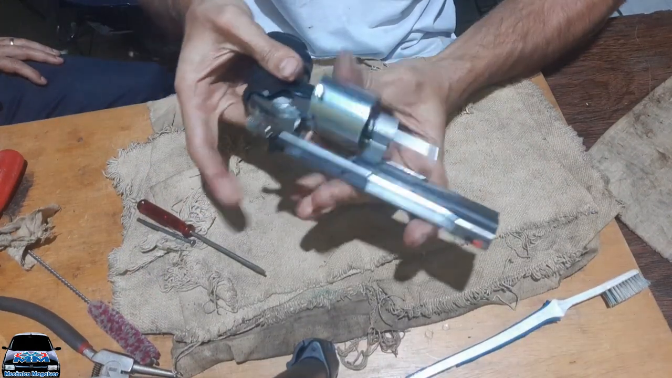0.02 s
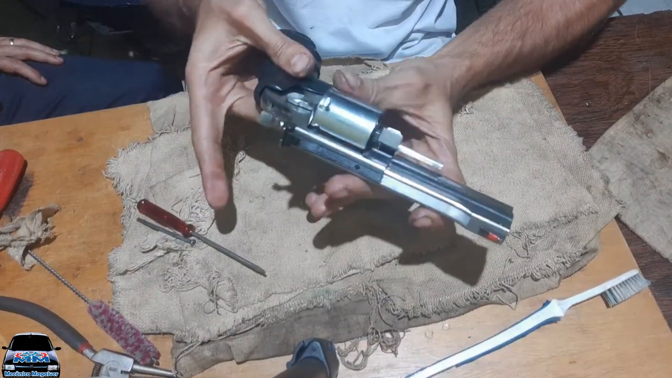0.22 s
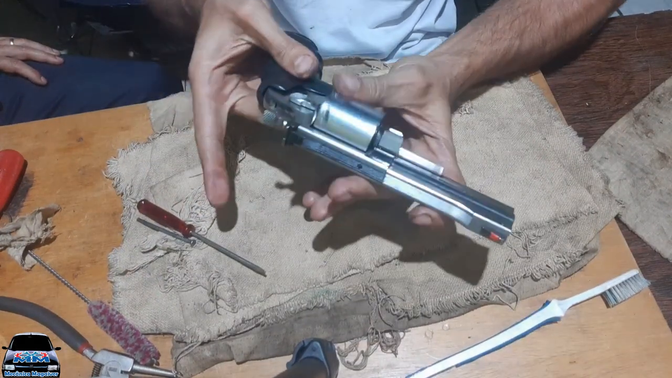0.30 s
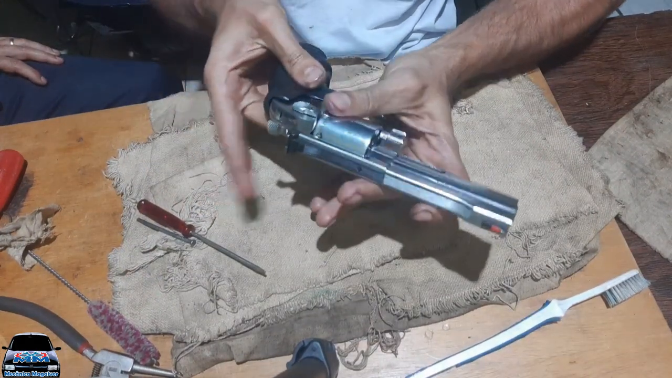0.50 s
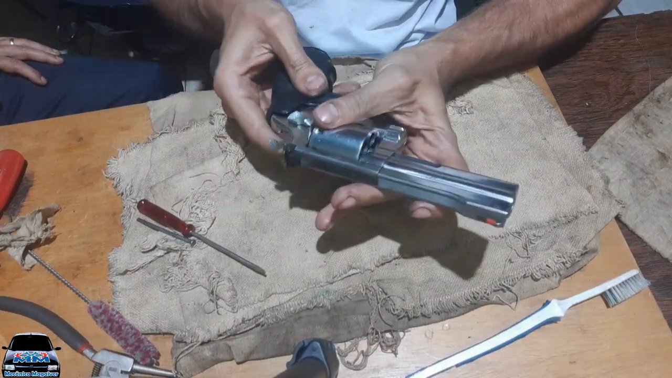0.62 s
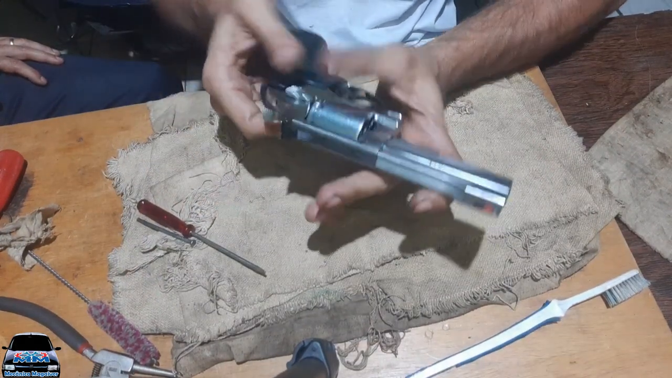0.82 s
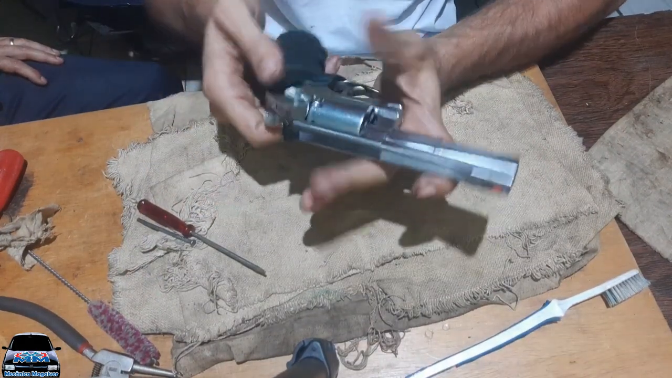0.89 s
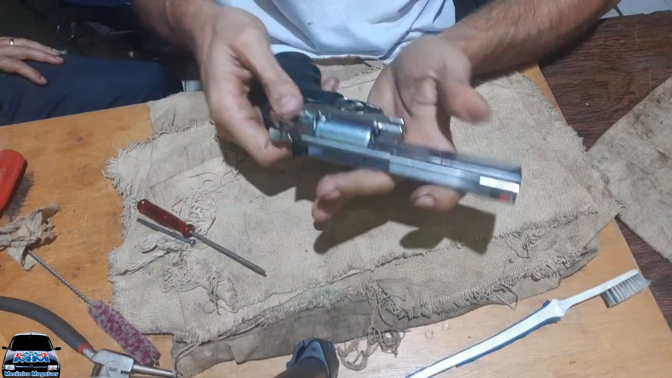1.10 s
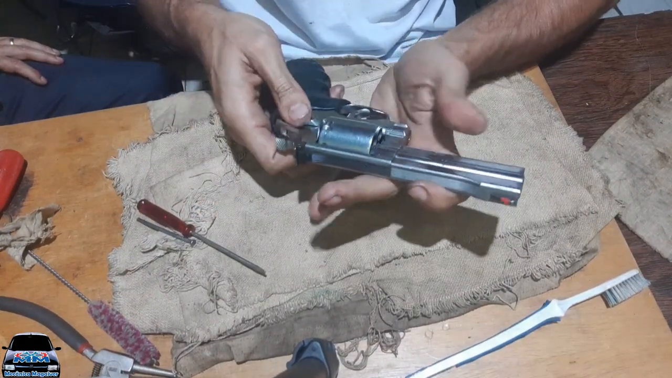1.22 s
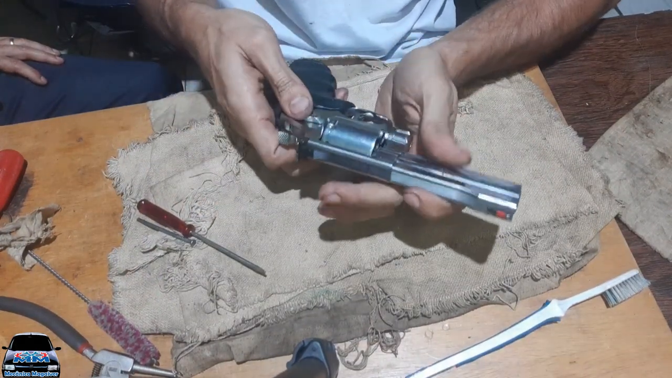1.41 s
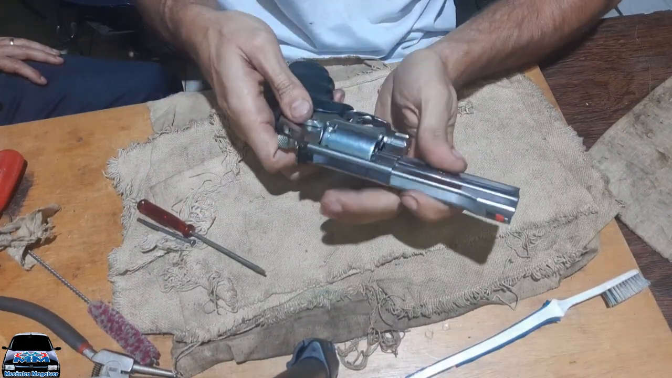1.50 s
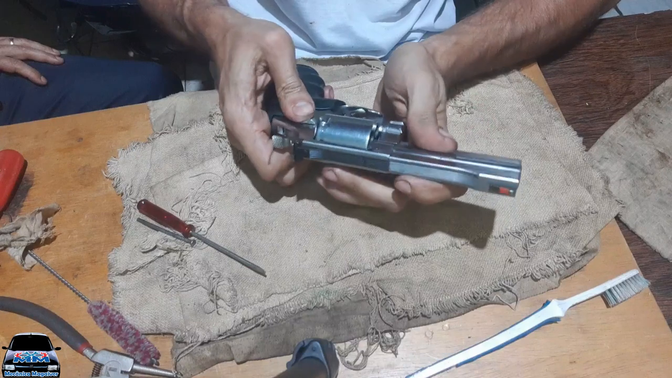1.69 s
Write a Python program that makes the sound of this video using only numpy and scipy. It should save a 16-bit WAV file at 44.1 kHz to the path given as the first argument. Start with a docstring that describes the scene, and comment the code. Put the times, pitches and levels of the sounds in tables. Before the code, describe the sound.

Three sharp steel clicks of a hand-held revolver in a small live room, over faint hum

```python
"""Revolver handled over a workbench

In a small, live room, close by, the cylinder snaps shut, turns until its stop drops into a notch,
and the hammer is cocked. Each click is a few steel contacts: noise cracks and damped paired modes.
A grip knock, faint rings and a diffuse noise tail follow; swells of noise are sliding and a scuff.
A low sine hum and banded room noise lie beneath; two faint narrow-band tones waver near the end."""
import sys
import numpy as np
from scipy import signal
from scipy.io import wavfile

SR = 44100
rng = np.random.default_rng(int(sys.argv[2]) if len(sys.argv) > 2 else 0)


def materialize(psi):
    """Save the field psi as 16-bit PCM at rate SR to the path in sys.argv[1].

    A 1-D psi becomes a single channel; in a 2-D psi each row is a channel.
    """
    bounded = np.clip(np.atleast_2d(psi).T, -1, 1)
    quanta = np.round(bounded * 32767).astype(np.int16)
    wavfile.write(sys.argv[1], SR, quanta)


N = 74970
T = np.arange(N) / SR   # time in s

# room noise in bands: pitch_hz, level_db (gain of the white noise), left_right_correlation
ROOM_NOISE = [(25.4, -49.5, .9), (61.4, -42, 0.93), (109.4, -42.5, 0.89), (167, -57.5, 0.66),
              (420, -54.5, 0.61), (1120, -59, 0.11), (1840, -66, 0.14), (4736, -76, 0.086),
              (9190, -77, 0.13), (15000, -91, 0.29)]
# change in level of the noise below RUMBLE_TOP_HZ: time_s, level_db
RUMBLE_LEVEL = [(0, 1.5), (.35, -1.5), (.55, 4.5), (.9, 3.5), (1.15, 2.5), (1.4, 0), (1.7, -3)]
# change in level of the noise above it: time_s, level_db
HISS_LEVEL = [(0, 1), (.2, 0), (.6, 5.5), (1.0, 5), (1.3, 2), (1.7, 0)]
# level of the hum: time_s, level_db
HUM_LEVEL = [(0, -69.5), (.3, -64), (.7, -61), (1.1, -64.5), (1.3, -64), (1.5, -92), (1.7, -78.5)]
RUMBLE_TOP_HZ, HUM_HZ = 160, 104

# steel contacts as the cylinder shuts: start_s, strength_db
SHUT_CONTACTS = [(0.2254, -9.5), (0.2265, -3.5), (0.2278, -6)]
# steel contacts as the stop drops into its notch: start_s, strength_db
LOCK_CONTACTS = [(0.499, -1.5), (0.5022, -14.5)]
# steel contacts as the hammer is cocked: start_s, strength_db
COCK_CONTACTS = [(0.7160, -15), (0.7172, 1), (0.7188, -4), (0.7186, -8.5)]
ACTIONS = (SHUT_CONTACTS, LOCK_CONTACTS, COCK_CONTACTS)
# modes of the hand-held frame, levels relative to the contacts:
# pair_centre_hz, t60_s, shut_db, lock_db, cock_db
FRAME_MODES = [(812, .022, -43.5, -57, -45), (1130, 0.013, -43.5, -43.5, -36.5),
               (1503, .028, -25.5, -37, -37.5), (1785, .016, -31, -49, -47), (1970, 0.014, -29, -62, -43),
               (2370, .021, -19.5, -28.5, -46), (2662, 0.018, -34.5, -65, -63),
               (3230, 0.023, -24, -42, -35.5), (3738, 0.012, -32.5, -37, -43),
               (4168, 0.014, -19, -21.5, -29), (4716, 0.0099, -24.5, -45.5, -44),
               (5270, 0.016, -27, -34.5, -37.5), (5670, .02, -41, -25.5, -31),
               (5970, .018, -37.5, -30.5, -35.5), (7800, 0.013, -34.5, -54, -35.5),
               (8990, 0.013, -41.5, -27.5, -32), (10500, 0.0099, -46, -37, -39.5)]
# noise colour of the contacts, relative to their strength: pitch_hz, shut_db, lock_db, cock_db
CRACK_COLOUR = [(243.5, -57, -57, -52), (640, -21.5, -20, -38), (1104, -22.5, -39.5, -26.5),
                (1997, -7.5, -30, -34), (4020, -12, -17.5, -23.5), (7550, -14, -16.5, -24),
                (10865, -28, -29.5, -20.5), (15000, -29, -31.5, -41)]
CRACK_T60_S = 0.013
LOW_CUT_HZ = 490   # the gun is too small to radiate bass
PAIR_SPLIT_HZ = 70   # spacing of the two modes in a pair
PAIR_APART_HZ = 2010   # above this the two of a pair radiate in different directions
MODE_TURN_RAD, MODE_TURN_HALF_HZ = 2.3, 1200   # limit of the phase between sides; pitch of half that
ALIKE_BELOW_HZ = 3000   # the crack is much alike on both sides below this
PAN_DB, SHADED_ABOVE_HZ = 2, 3200   # limit of the lean on each side; pitch of half that

# hollow knock of the grip: level_db, one value each for shut, lock and cock
KNOCK_LEVELS = [-40, -33, -44.5]
KNOCK_HZ, KNOCK_T60_S, KNOCK_BUILD_S = 496, 0.033, 0.0066
# parts that ring on faintly: start_s, pitch_hz, level_db, t60_s
FAINT_RINGS = [(0.225, 1486, -55, 0.27), (0.227, 1520, -56, 0.54), (0.226, 2003, -56, 0.24),
               (0.226, 2170, -57, 0.18), (0.227, 2425, -64, 0.24), (0.224, 2670, -53, 0.41),
               (0.227, 2812, -58, 0.35), (0.225, 3056, -49, 0.3), (0.227, 3140, -53, 0.25),
               (0.225, 4110, -54.5, 0.25), (0.226, 4365, -57.5, 0.22), (0.226, 7660, -58, 0.43),
               (0.499, 624, -63, 1), (0.497, 390, -70.5, 1), (0.499, 4065, -58.5, 0.32),
               (0.5, 5900, -57, 0.32), (0.499, 7370, -66, .35), (0.718, 4083, -65, 0.32),
               (0.718, 4295, -65, 0.4), (0.718, 5745, -58.5, 0.35), (0.718, 9200, -60.5, 0.35)]

# the room's tail after each action, before early scatter and gun colour:
# pitch_hz, t60_s, shut_db, lock_db, cock_db
ROOM_TAIL = [(256.6, 0.67, -73, -65.5, -55), (594, 1, -42, -62.5, -62), (1103, 0.42, -44, -46.5, -48),
             (1478, 0.59, -35.5, -53.5, -51.5), (2580, 0.78, -36.5, -54, -55),
             (4200, 0.61, -37.5, -47.5, -47), (5850, 0.66, -41, -46.5, -48),
             (8500, 0.51, -43, -43.5, -46.5), (10800, 0.43, -47.5, -53.5, -42),
             (15020, 0.33, -62, -56, -65)]
# resonances of the gun added to the room's tail: pitch_hz, width_hz, gain_db
GUN_RESONANCES = [(1520, 94, 5), (1930, 60, -10), (2380, 63, 0.5), (2640, 140, -2.5), (3174, 59, -7.5),
                  (4160, 220, 2.5), (6100, 225, -7.5), (7550, 290, -4), (9800, 250, -6)]
ROOM_DELAY_S, ROOM_BUILD_S = 0.0013, 0.0042
EARLY_DB, EARLY_T60_S = 1, 0.08   # boost relative to the tail; its fade on top of the tail's decay
ROOM_LIKENESS, ROOM_PAN_DB = 0.019, 0.1   # left-right correlation; boost at left and cut at right

# steel sliding under the fingers, level before colour: peak_s, rise_s, fall_s, level_db
STEEL_SLIDES = [(0.4925, 0.0056, 0.007, -53.5), (0.711, 0.0092, 0.004, -67)]
# colour of the sliding: pitch_hz, gain_db
STEEL_SLIDE_COLOUR = [(300, -26), (900, 6.5), (1600, 18), (2700, 6.5), (6000, -1.5), (10000, -6.5),
                      (15000, -25)]
# the hand scuffs the grip, level before colour: peak_s, rise_s, fall_s, level_db
GRIP_SCUFFS = [(1.074, 0.014, .018, -69.5)]
# colour of the scuff: pitch_hz, gain_db
GRIP_SCUFF_COLOUR = [(300, -24), (1000, -9), (1700, 13), (2700, 12), (4000, 7.5), (6000, -4), (10000, -1),
                     (15000, -20)]

# faint, breathy tone wavering in the background: time_s, pitch_hz, level_db
HIGH_TONE_PATH = [(1.13, 1240, -84), (1.21, 1250, -63), (1.3, 1245, -69), (1.37, 1225, -71),
                  (1.41, 1190, -67.5), (1.47, 1240, -67.5), (1.545, 1199, -66), (1.61, 1209, -76.5),
                  (1.655, 1189, -66), (1.69, 1162, -84.5)]
# lower tone swelling beneath it: time_s, pitch_hz, level_db
LOW_TONE_PATH = [(1.33, 480, -93), (1.44, 475.8, -73.5), (1.5, 485, -72), (1.536, 471.6, -68),
                 (1.7, 459, -71.5)]
HIGH_WIDTH_HZ, HIGH_LIKENESS = 70, -0.36   # bandwidth; left-right correlation
LOW_WIDTH_HZ, LOW_LIKENESS = 88, 0.79
CUTOFF_HZ = 15800

LEFT_RIGHT = np.array([[1], [-1]])   # opposite signs for the two channels


def from_db(db):
    """Amplitude gain is ten to the power of decibels over twenty."""
    return 10 ** (np.asarray(db) / 20)


def at_hz(table, hz, axis=1):
    """Interpolation on a logarithmic pitch axis reads one column of a table."""
    table = np.array(table)
    return np.interp(np.log(hz), np.log(table[:, 0]), table[:, axis])


def gain_curve(rows):
    """Straight lines in decibels between time points give a gain over time."""
    return from_db(np.interp(T, *np.transpose(rows)))


def dying(start, t60):
    """Exponential decay: from 1 at the start, amplitude falls by 60 dB in t60."""
    return (T >= start) * np.exp(-np.log(1000) * np.maximum(T - start, 0) / t60)


def ring(start, hz, t60):
    """Free vibration: a struck mode is a sine with exponential decay."""
    return dying(start, t60) * np.sin(2 * np.pi * hz * (T - start))


def noise_bands():
    """Band-pass filtering splits white noise: half octaves in the bass, thirds above."""
    edges = np.r_[np.geomspace(22, 1000, 11)[:-1], np.geomspace(1000, 17000, 14)]
    # neighbouring bands take different noise; the extra samples let the filters settle
    white = rng.standard_normal((2, 2, N + 8000))
    for k, (low, high) in enumerate(zip(edges, edges[1:])):
        sos = signal.butter(2, [low, high], "band", fs=SR, output="sos")
        mid, side = signal.sosfilt(sos, white[k % 2])[:, -N:]
        yield np.sqrt(low * high), mid, side * LEFT_RIGHT


def stereo(mid, side, likeness):
    """Mid-side mixing of independent noises sets the correlation between two channels."""
    c = np.clip(likeness, -1, 1)
    return np.sqrt((1 + c) / 2) * mid + np.sqrt((1 - c) / 2) * side


def background():
    """Stationary noise under slow level curves gives rumble and hiss; a sine gives the hum."""
    rumble, hiss = gain_curve(RUMBLE_LEVEL), gain_curve(HISS_LEVEL)
    noise = 0
    for hz, mid, side in noise_bands():
        change = rumble if hz < RUMBLE_TOP_HZ else hiss
        likeness = at_hz(ROOM_NOISE, hz, axis=2)
        noise = noise + change * from_db(at_hz(ROOM_NOISE, hz)) * stereo(mid, side, likeness)
    hum = gain_curve(HUM_LEVEL) * np.sin(2 * np.pi * (HUM_HZ * T + rng.random()))
    return noise + hum


def struck(contacts, t60):
    """Energy addition: the squared envelopes of successive contacts are summed."""
    return np.sqrt(sum((from_db(db) * dying(s, t60)) ** 2 for s, db in contacts))


def placed(hz):
    """Level difference between the sides grows with pitch: the treble leans to the left."""
    return from_db(PAN_DB * LEFT_RIGHT / (1 + (SHADED_ABOVE_HZ / hz) ** 2))


def frame_mode(hz, since, lead):
    """Beating of a close pair of modes, shared unequally by the sides; lead +1 puts left first."""
    turn = lead * MODE_TURN_RAD * hz / (hz + MODE_TURN_HALF_HZ) * LEFT_RIGHT / 2
    low = np.sin(2 * np.pi * (hz - PAIR_SPLIT_HZ / 2) * since + turn)
    high = np.sin(2 * np.pi * (hz + PAIR_SPLIT_HZ / 2) * since + turn)
    high_share = .5 - lead * LEFT_RIGHT / 2 / (1 + (PAIR_APART_HZ / hz) ** 2)
    return ((1 - high_share) * low + high_share * high) * placed(hz)


def clicks():
    """Impact excitation: contacts give a noise crack and ring the frame, coloured by action."""
    out, bands = np.zeros((2, N)), list(noise_bands())
    for k, contacts in enumerate(ACTIONS):
        since = T - contacts[0][0]
        for m, (hz, t60, *levels) in enumerate(FRAME_MODES):
            lead = (-1) ** m
            out += from_db(levels[k]) * struck(contacts, t60) * frame_mode(hz, since, lead)
        crack = 0
        for hz, mid, side in bands:
            gain = from_db(at_hz(CRACK_COLOUR, hz, axis=k + 1)) * placed(hz)
            likeness = 1 / (1 + (hz / ALIKE_BELOW_HZ) ** 2)
            crack = crack + gain * stereo(mid, side, likeness)
        out += struck(contacts, CRACK_T60_S) * crack
    low_cut = signal.butter(4, LOW_CUT_HZ, "high", fs=SR, output="sos")
    return signal.sosfilt(low_cut, out + 1e-18)   # tiny offset avoids slow denormal numbers


def knocks():
    """Delayed build-up of a damped mode: the grip answers each action just after the steel."""
    out = 0
    for contacts, db in zip(ACTIONS, KNOCK_LEVELS):
        start = contacts[0][0]
        build = np.clip((T - start) / KNOCK_BUILD_S, 0, 1)
        out = out + from_db(db) * build * ring(start, KNOCK_HZ, KNOCK_T60_S)
    return out


def after_ring():
    """Light damping: parts that the hands do not damp sing on."""
    return sum(from_db(db) * ring(s, hz, t60) for s, hz, db, t60 in FAINT_RINGS)


def room():
    """Reverberation: early scatter from the bench, then a diffuse tail decaying band by band."""
    out = 0
    starts = [contacts[0][0] + ROOM_DELAY_S for contacts in ACTIONS]
    swells = []
    for s in starts:
        build = np.clip((T - s) / ROOM_BUILD_S, 0, 1)
        swells.append(build * (1 + from_db(EARLY_DB) * dying(s, EARLY_T60_S)))
    for hz, mid, side in noise_bands():
        t60 = at_hz(ROOM_TAIL, hz)
        level = sum(from_db(at_hz(ROOM_TAIL, hz, axis=k + 2)) * swells[k] * dying(s, t60)
                    for k, s in enumerate(starts))
        out = out + level * stereo(mid, side, ROOM_LIKENESS)
    return out * from_db(ROOM_PAN_DB * LEFT_RIGHT)


def coloured(x):
    """Resonance: narrow filters added in parallel keep the gun's strongest modes in the tail."""
    out = x
    for hz, width, db in GUN_RESONANCES:
        b, a = signal.iirpeak(hz, hz / width, fs=SR)
        out = out + from_db(db) * signal.lfilter(b, a, x)
    return out


def friction(strokes, colour):
    """Sliding friction: coloured noise swells and fades on Gaussian flanks as the gun is moved."""
    swell = 0
    for s, rise, fall, db in strokes:
        flank = np.where(T < s, rise, fall)   # standard deviation in s
        swell = swell + from_db(db) * np.exp(-((T - s) / flank) ** 2 / 2)
    return swell * sum(from_db(at_hz(colour, hz)) * mid for hz, mid, side in noise_bands())


def wavering_tone(rows, width_hz, likeness):
    """Quadrature modulation: slow noise on a gliding carrier makes a narrow-band tone."""
    times, pitches, levels = np.transpose(rows)
    hz, db = np.interp(T, times, pitches), np.interp(T, times, levels)
    low_pass = signal.butter(2, width_hz / 2, fs=SR, output="sos")
    flutter = signal.sosfilt(low_pass, rng.standard_normal((2, 2, N)))
    phase = 2 * np.pi * np.cumsum(hz) / SR
    mid, side = (flutter[0] * np.cos(phase) + flutter[1] * np.sin(phase)) / flutter.std()
    return from_db(db) * stereo(mid, side * LEFT_RIGHT, likeness)


def scene():
    """Superposition: the revolver close by, the room behind it, noise and tones beneath."""
    gun = clicks() + knocks() + after_ring()
    slides = friction(STEEL_SLIDES, STEEL_SLIDE_COLOUR)
    scuffs = friction(GRIP_SCUFFS, GRIP_SCUFF_COLOUR)
    high_tone = wavering_tone(HIGH_TONE_PATH, HIGH_WIDTH_HZ, HIGH_LIKENESS)
    low_tone = wavering_tone(LOW_TONE_PATH, LOW_WIDTH_HZ, LOW_LIKENESS)
    return background() + gun + coloured(room()) + slides + scuffs + high_tone + low_tone


def record(dry):
    """Elliptic low-pass filtering cuts the top steeply."""
    low_pass = signal.ellip(10, .1, 70, CUTOFF_HZ, fs=SR, output="sos")   # ripple, stop band in dB
    return signal.sosfilt(low_pass, dry)


dry = scene()
out = record(dry)
materialize(out)
```